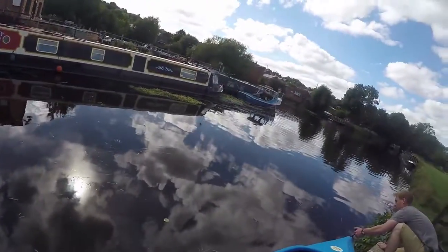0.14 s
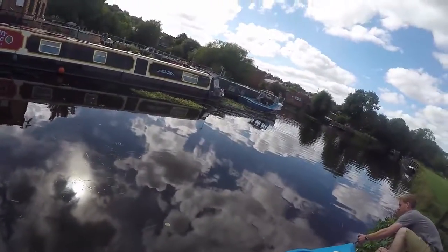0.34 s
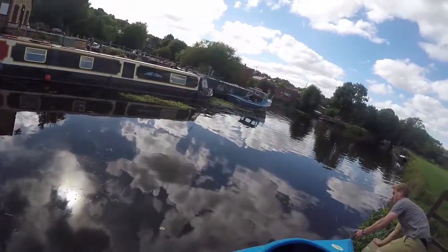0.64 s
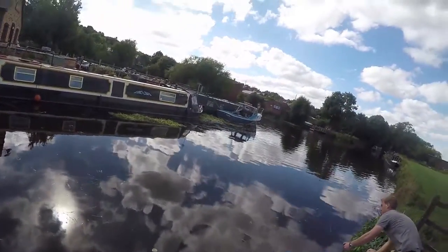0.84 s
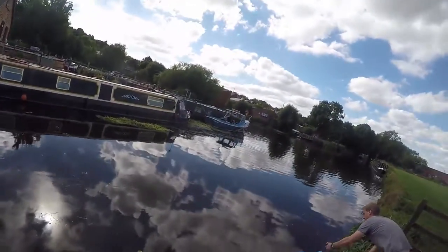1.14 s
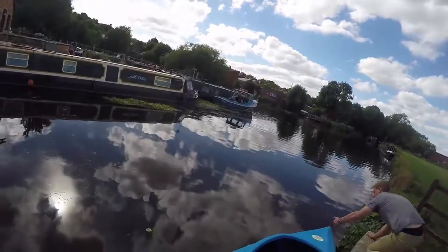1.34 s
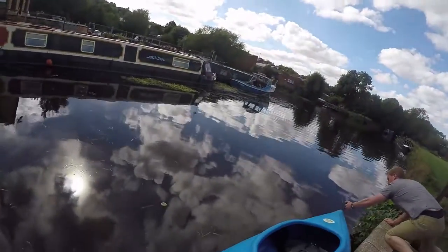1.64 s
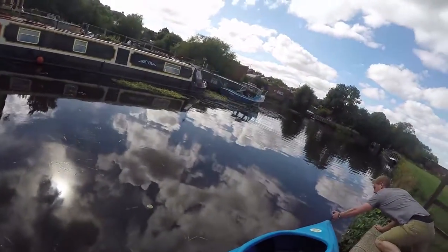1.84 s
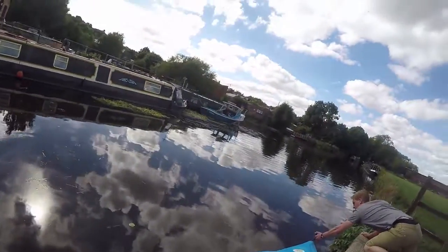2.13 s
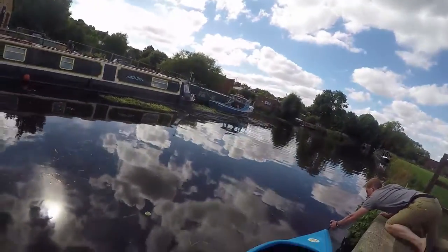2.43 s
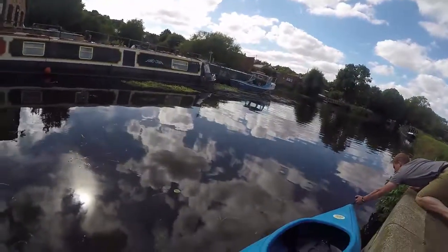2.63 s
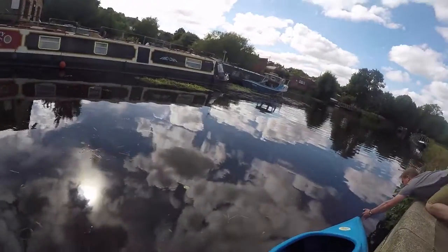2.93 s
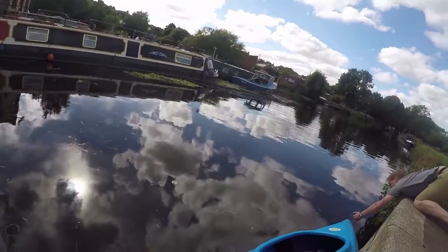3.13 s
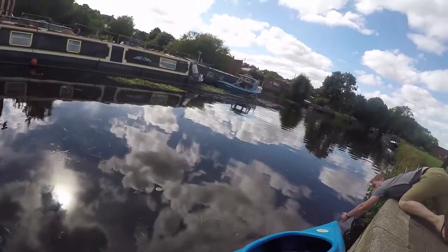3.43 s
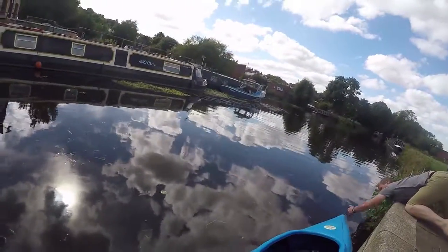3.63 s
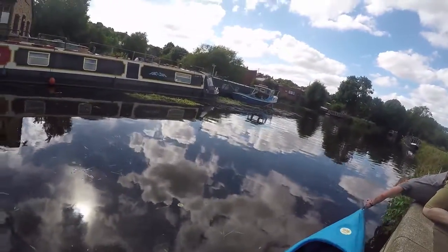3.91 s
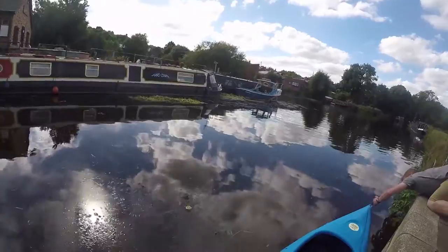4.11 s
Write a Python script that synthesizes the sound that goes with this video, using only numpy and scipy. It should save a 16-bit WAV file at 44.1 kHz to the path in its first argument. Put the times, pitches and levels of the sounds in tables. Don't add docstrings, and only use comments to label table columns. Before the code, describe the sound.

A deep, fluttering rumble runs throughout, felt through a sealed case riding on a hollow plastic hull. At 0 seconds a low push booms, with a small skid and tiny ticks until about 0.3. It thins to rumble, faint open air and a very thin high whine, with a light tick at 0.55. Around 1.05-1.35 a dull skid, a low thump and a few gritty rubs arrive, then soft rubbing fades towards 2. From 2.0 to 2.9 the hull sticks and slips on stone: close-spaced scrapes, hollow knocks and low shudders. It calms, broken by a small bump at 3.1 and a crisp tick at 3.35. Sharper clicks at 3.68 lead to the loudest moment, about 3.82-3.9: a hard bright crack, hollow thud and coarse scrape. Duller scrapes, a short knock at 4.07 and low sway trail off to the end, about 4.3 seconds.

```python
import sys
import numpy as np
from scipy import signal
from scipy.fft import rfft, irfft, next_fast_len
from scipy.io import wavfile
from scipy.ndimage import map_coordinates

SR = 44100
rng = np.random.default_rng(int(sys.argv[2]) if len(sys.argv) > 2 else 0)


def file_out(sig):
    cols = np.atleast_2d(sig).T
    lim = np.clip(cols, -1, 1)
    pcm = np.round(lim * 32767).astype(np.int16)
    wavfile.write(sys.argv[1], SR, pcm)


def convert_level_to_amplitude(level_db):
    exponent = np.asarray(level_db, float) / 20
    return 10 ** exponent


N = 188130

# pitch_hz, level_db (per Hz)
HULL_BODY = [(47, -11), (80, 6.5), (110, 4), (150, 2), (200, -1.5), (270, -5), (345, -13), (420, -24.5),
             (500, -23.5), (600, -29.5), (840, -51), (1430, -120)]


def unit(x):
    return x / np.sqrt(np.mean(x ** 2) + 1e-20)


def along(points, hz):
    point_hz, value = np.transpose(points)
    return np.interp(np.log(hz + 1), np.log(point_hz + 1), value)


def wobble(rate_hz):
    knots = rng.standard_normal(int(N * rate_hz / SR) + 4)
    return map_coordinates(knots, [np.arange(N) * rate_hz / SR])


def filtered(x, response):
    size = next_fast_len(N + SR // 2)
    spectrum = rfft(x, size) * response(np.fft.rfftfreq(size, 1 / SR))
    return irfft(spectrum, size)[..., :N]


def noise(spectrum):
    return unit(filtered(rng.standard_normal(N), lambda hz: convert_level_to_amplitude(along(spectrum, hz))))


def band(x, lo_hz, hi_hz):
    edges_hz = [lo_hz, min(hi_hz, SR / 2.1)]
    return signal.sosfilt(signal.butter(2, edges_hz, "bandpass", fs=SR, output="sos"), x)


def whine():
    # pitch_hz, width_hz, level_db (rms)
    whine_lines = [(4790, 120, -88), (9550, 80, -90), (14400, 300, -83)]
    out = np.zeros(N)
    for pitch_hz, width_hz, level_db in whine_lines:
        line = filtered(rng.standard_normal(N), lambda hz: 1 / (1 + (2 * (hz - pitch_hz) / width_hz) ** 2))
        out += convert_level_to_amplitude(level_db) * unit(line)
    return out


def background():
    # pitch_hz, level_db (per Hz)
    air_spectrum = [(59, -39), (100, 2.5), (176, -23.5), (230, -11.5), (494, -17.5), (1010, -19.5),
                    (1600, -22), (2400, -24.5), (4600, -26.5), (5600, -28.5), (9000, -33.5), (12000, -34),
                    (13300, -38), (14900, -39)]
    air_db, top_hz = -62.5, 14950
    air = convert_level_to_amplitude(air_db + wobble(5.66) / 2) * noise(air_spectrum)
    return filtered(air + whine(), lambda hz: hz < top_hz)


def contact():
    # start_s, pressure_db, sway_db
    hold = [(0, -32, -31), (.13, -33.5, -32.5), (.36, -45.5, -32.5), (.57, -64, -37.5),
            (1.12, -59.5, -31.5), (1.22, -41.5, -27.5), (1.66, -48.5, -35), (2.02, -51.5, -28.5),
            (2.16, -31, -36), (2.46, -24, -32.5), (2.6, -36, -42), (2.701, -21, -30), (2.86, -46, -35.5),
            (3.1, -64, -34), (3.79, -49, -32.5), (3.86, -20.5, -31), (4.04, -33, -24.5), (4.27, -38, -36)]
    start_s, *columns = np.transpose(hold)
    return [np.interp(np.arange(N) / SR, start_s, column) for column in columns]


def rumble(sway_db):
    # pitch_hz, level_db (per Hz)
    shaking_spectrum = [(11, -21), (20, -4), (40, 7), (62, -1), (75, -3), (86, -20), (105, -34), (140, -55),
                        (240, -120)]
    swings_db, swings_hz = 1, 9
    return convert_level_to_amplitude(sway_db + swings_db * wobble(swings_hz)) * noise(shaking_spectrum)


def hollow_body(pressure_db):
    shell = unit(convert_level_to_amplitude(2.2 * wobble(40)) * noise(HULL_BODY))
    return convert_level_to_amplitude(pressure_db - 2.0) * shell


def ringing(hz):
    # pitch_hz, width_hz, level_db
    modes = [(503, 125, -9), (760, 175, -2), (884, 21, -2), (966.5, 148, 2.5), (1013, 61, -8.5),
             (1102, 34, -7.5), (1180, 46, -11), (1266, 68, -21), (1430, 257, 2.5), (2050, 176, 3),
             (1820, 23, -8), (2204, 30, -1), (2445, 354, 1.5), (2406, 87, -13.5), (2617, 96, -19),
             (2564, 160, -32), (3220, 590, -1.5), (4070, 630, -7), (4630, 220, -14.5), (5850, 320, -19),
             (6370, 220, -23), (6600, 170, -44), (7600, 570, -24.5), (8300, 3300, -36), (10900, 3700, -43),
             (13100, 1600, -26)]
    total = 0
    for pitch_hz, width_hz, level_db in modes:
        damping = 1.3j * hz * width_hz
        total = total + convert_level_to_amplitude(level_db / 2) * damping / (pitch_hz ** 2 - hz * hz + damping)
    return total ** 2


def scrape(edges_hz, spread_db):
    grain_hz, common = 500, 0.5
    shared = wobble(grain_hz)
    grains = []
    for _ in edges_hz:
        uneven_db = spread_db * (common * shared + wobble(grain_hz)) + 1.27 * wobble(70)
        grains.append(convert_level_to_amplitude(uneven_db) * rng.standard_normal(N))
    return np.array([unit(band(filtered(x, ringing), *edge)) for x, edge in zip(grains, edges_hz)])


def grit(pressure_db):
    reference_db = -40.5
    over_db = pressure_db - reference_db
    coarse_db = -60.5 + 0.47 * over_db
    fine_db = -64 + 0.14 * over_db
    parts = scrape([(450, 1090), (1800, 19000)], spread_db=1.5)
    return (convert_level_to_amplitude(np.array([coarse_db, fine_db]) - 4.0) * parts).sum(axis=0)


def drag():
    pressure_db, sway_db = contact()
    return rumble(sway_db) + hollow_body(pressure_db) + grit(pressure_db)


def booms():
    # start_s, level_db, pitch_hz, t60_s, shudder_db
    pressed = [
        (.004, 4, 29.2, 0.12, -32),
        (0.101, -28.5, 107, 0.59, -52),
        (3.635, -50, 300, 0.12, -45),
        (3.681, -34, 50, .096, -31),
        (3.828, 4.5, 123.4, 0.049, -15.5),
        (3.86, -1, 121, 0.056, -54),
        (3.903, -15.5, 90, 0.35, -24),
        (4.077, -16, 216, 0.067, -27.5),
    ]
    # start_s, level_db, pitch_hz, t60_s, shudder_db
    sprung = [(1.152, -36, 288.5, 0.11, -31.5), (1.2, -1, 37.6, 0.13, -46), (2.12, -38, 291, 0.13, -45),
              (2.19, -34, 454, 0.11, -25), (2.577, -31.5, 483, 0.085, -27), (3.696, -28, 379, .08, -31.5),
              (3.845, -20.5, 359, 0.11, -46), (2.276, -22.5, 342, 0.043, -40),
              (2.375, -24.5, 347, 0.12, -53), (2.437, -19, 360, 0.043, -26), (2.66, -18.5, 67.8, 0.51, -26),
              (2.783, -27, 103.2, 0.38, -36), (2.953, -34.5, 209, 0.061, -42.5),
              (3.176, -44.5, 262, 0.099, -52), (3.356, -54, 398, 0.17, -54),
              (3.876, -2.5, 48.7, 0.099, -48), (4.083, -20, 69, 0.54, -38)]
    out, shake, t = np.zeros(N + SR), np.zeros(N + SR), np.arange(SR // 2) / SR
    jolts = [(-1, row) for row in pressed] + [(1, row) for row in sprung]
    for sign, (start_s, level_db, pitch_hz, t60_s, shudder_db) in jolts:
        start = round(start_s * SR)
        rise = 1 - np.exp(-(t * pitch_hz * 2.2) ** 2)
        swing = convert_level_to_amplitude(level_db - 60 * t / t60_s) * np.sin(2 * np.pi * pitch_hz * t)
        out[start:][:len(t)] += sign * rise * swing
        shake[start:][:len(t)] += convert_level_to_amplitude(shudder_db - 60 * t / 0.32) * (1 - np.exp(-t / 0.00087))
    return out[:N] + shake[:N] * noise(HULL_BODY)


def snaps():
    # start_s, peak_db, pitch_hz
    ticks = [(.045, -36.5, 3460), (.064, -49, 8400), (0.099, -36, 870), (0.184, -39.5, 870),
             (.253, -45, 840), (.26, -45, 2590), (.32, -46, 1160), (.542, -38, 8230), (1.082, -37.5, 2110),
             (1.081, -48, 6600), (1.25, -45, 8000), (1.264, -50, 8300), (1.304, -42.5, 6570),
             (2.429, -44, 7900), (2.664, -47, 4730), (2.664, -48, 6400), (3.349, -29, 4800),
             (3.348, -30.5, 10230), (3.348, -33, 1140), (3.647, -47, 7700), (3.678, -30.5, 6180),
             (3.679, -25.5, 3540), (3.824, -13.5, 760), (3.822, -11.5, 1190), (3.825, -9.5, 3420),
             (3.824, -8.5, 2314), (3.851, -15, 1040), (3.959, -23, 3170), (4.033, -37, 7600),
             (4.074, -34.5, 7500)]
    # start_s, peak_db, pitch_hz
    chips = [
        (3.7, -64, 10800),
        (4.3, -60, 6400),
        (.555, -67, 6400),
    ]
    # pitch_hz, t60_s
    tick_t60 = [(800, 0.018), (3000, 0.011), (9000, 0.0076)]
    chip_t60_s = 0.25
    out, t = np.zeros(N + SR), np.arange(SR // 5) / SR
    events = [(*row, along(tick_t60, row[-1])) for row in ticks] + [(*row, chip_t60_s) for row in chips]
    for start_s, peak_db, pitch_hz, t60_s in events:
        drift = np.cumsum(0.11 * rng.standard_normal(len(t)))
        decay = convert_level_to_amplitude(peak_db + 1.5 - 60 * t / t60_s)
        tone = np.sin(2 * np.pi * pitch_hz * t + drift)
        out[round(start_s * SR):][:len(t)] += decay * (1 - np.exp(-t / 0.0011)) * tone
    return out[:N]


def jerks():
    # start_s, peak_db, brightness_db, knock_db
    taps = [(.097, -53.5, -12, 17), (.184, -61, -15, 13.5), (.251, -58, -3, 7), (2.354, -44, -5, 17.5),
            (2.72, -54.5, -15, 20), (.542, -50.5, 2, -3), (1.081, -49, -5, 4), (1.217, -50.5, -6, 9),
            (2.651, -49.5, -1, 17), (2.828, -52, -16, -13), (3.098, -44.5, -14, -4.5),
            (3.347, -30.5, -2, -4.5), (3.574, -59.5, -14, 11), (3.677, -25.5, -15.5, -2),
            (3.694, -36.5, -6, 8), (3.735, -47, -18, 7), (3.766, -53, -9, 7), (3.8219, -13, -11, -9.5),
            (3.843, -22, -14, -3), (3.892, -24, -2.5, -17), (3.911, -27.5, -7, 8), (4.013, -32, -18, -18),
            (4.17, -41.5, -25, -20), (4.25, -41.5, -9, -9)]
    # start_s, peak_db, brightness_db, knock_db
    slips = [(1.256, -59.5, 8, -1), (1.30, -55, -3, 6), (1.345, -51.5, -4, -13), (2.098, -43, -8.5, -18),
             (2.116, -41.5, -6.5, 9.5), (2.18, -42.5, -3.5, 11), (2.254, -39, -7, 9), (2.292, -50, -9, 16),
             (2.37, -43.5, -4, 15), (2.422, -47, -2.5, 16.5), (2.455, -44.5, -6, 9), (2.484, -47.5, -1, 17),
             (2.569, -42, 2, 14.5), (2.595, -50, -20, -5), (2.696, -50, -14, 10), (2.21, -52, -6, 12),
             (3.654, -58.5, 8, 17.5), (4.043, -33.5, -16, -9), (4.12, -41, -11, -8)]
    # start_s, peak_db, brightness_db, knock_db
    skids = [
        (.045, -48.5, -7, 3.5),
        (1.036, -51, -11, -7),
        (1.151, -47, -12, 4),
        (2.028, -48.5, -23, 4.5),
        (2.337, -46.5, -10, 4.5),
        (2.678, -42, -21, 2),
        (3.832, -25.5, -10.5, 8),
        (3.95, -32.5, -21, -21),
        (4.073, -42.5, -17, 13.5),
        (4.204, -43, -9, 1.5),
    ]
    # start_s, peak_db, brightness_db, knock_db
    rubs = [
        (1.27, -54.5, -3, -2.5),
        (1.4, -54, -6.5, 2),
        (1.52, -56.5, -18, 4.5),
        (1.89, -54.5, -22, 1.5),
        (1.98, -58, -22, 0),
        (3.84, -30, -6, -4.5),
        (3.93, -38.5, -6.5, -12),
        (4.07, -45.5, -6.5, -4),
    ]
    kinds = [(taps, 0.0015, 0.09), (slips, 0.0071, 0.11), (skids, 0.0024, 0.22), (rubs, 0.018, 0.38)]
    thud_db = -6.5
    fizz_db_per_s = 28
    t = np.arange(SR // 3) / SR
    shares = np.zeros((5, N + SR))
    lasting = np.array([[1.2], [1.1], [1.01], [0.9], [0.8]])
    for rows, rise_s, t60_s in kinds:
        swell = np.sin(np.pi / 2 * np.minimum(t / max(rise_s, 2e-4), 1)) ** 2
        fading = np.maximum(t - rise_s, 0) / (lasting * max(t60_s, 0.005))
        fall_db = 60 * fading ** (1 + min(rise_s / 0.017, 1))
        crack = 1 + 0.28 * np.exp(-(rise_s / 0.00073) ** 2 - t / 0.0005)
        for start_s, peak_db, bright_db, knock_db in rows:
            stroke = swell * convert_level_to_amplitude(peak_db - fall_db) * crack
            top_db = bright_db - 13 + 0.27 * (peak_db + 10) + fizz_db_per_s * t60_s
            share_db = [[knock_db + thud_db], [knock_db], [0], [bright_db], [top_db]]
            shares[:, round(start_s * SR):][:, :len(t)] += (convert_level_to_amplitude(share_db) * stroke) ** 2
    edges_hz = [(210, 400), (560, 1417), (1800, 3950), (5300, 9500), (9500, 13800)]
    parts = scrape(edges_hz, spread_db=1.5)
    return convert_level_to_amplitude(-10.5) * (np.sqrt(shares[:, :N]) * parts).sum(axis=0)


def scene():
    return (background() + drag() + booms() + snaps() + jerks())[None]


def band_limit(x):
    return signal.sosfilt(signal.butter(12, 15800, fs=SR, output="sos"), x)


def record(dry):
    top_hz, slope_hz = 15400, 250
    mix = filtered(dry, lambda hz: np.clip((top_hz - hz) / slope_hz, 0, 1))
    return band_limit(mix)


dry = scene()
out = record(dry)
file_out(out)
```